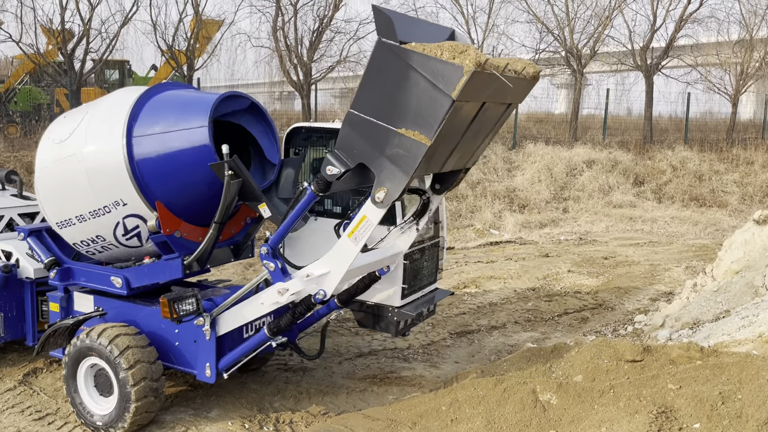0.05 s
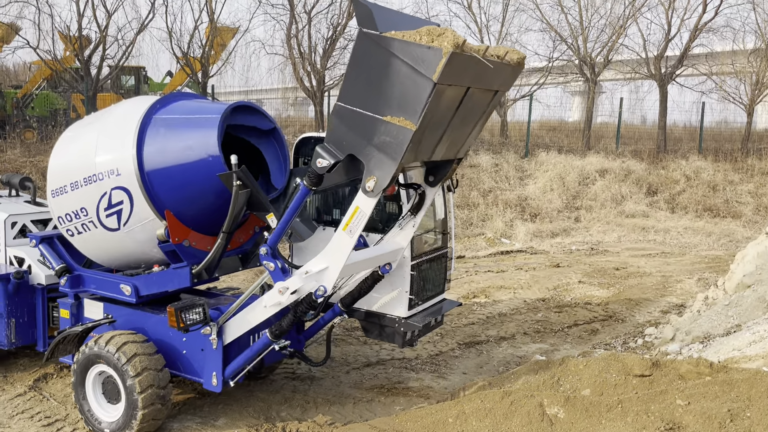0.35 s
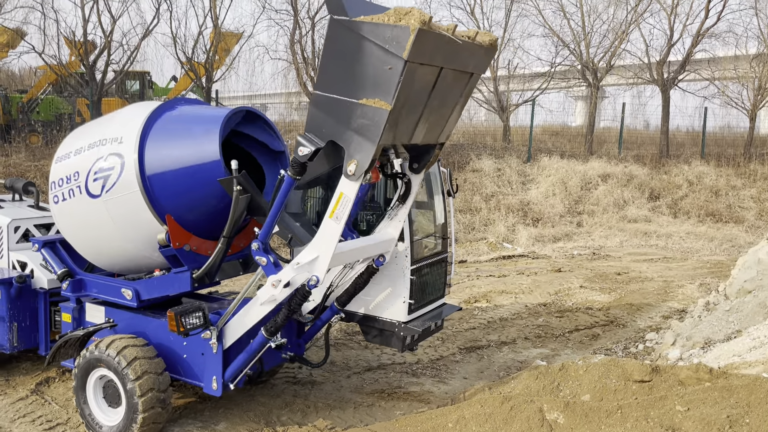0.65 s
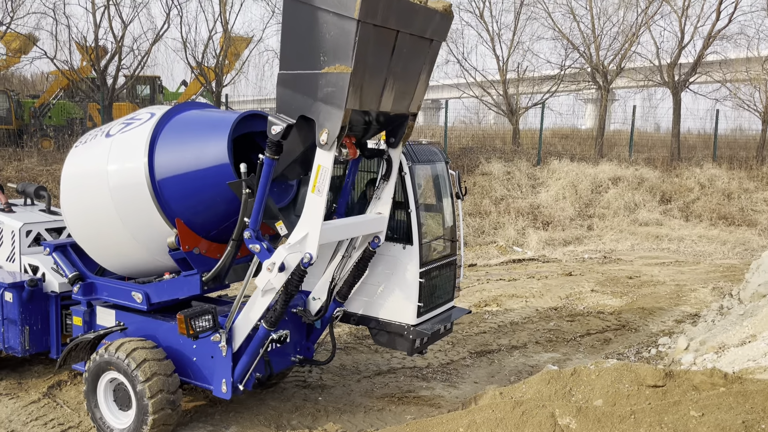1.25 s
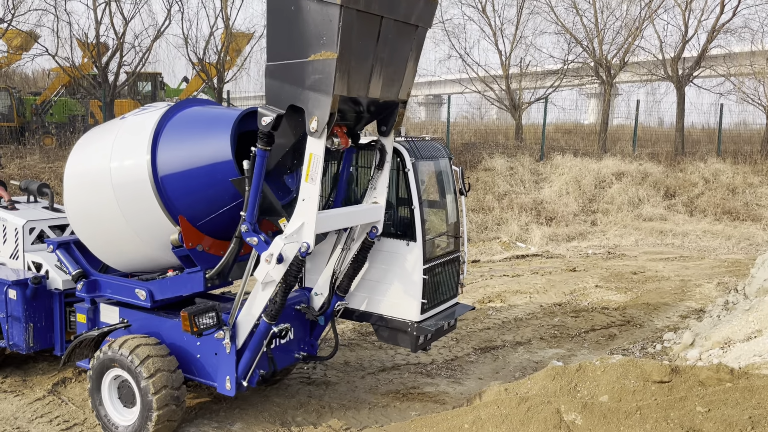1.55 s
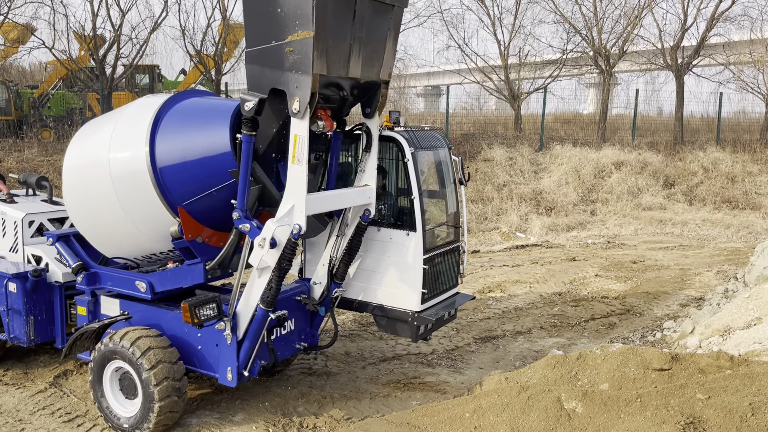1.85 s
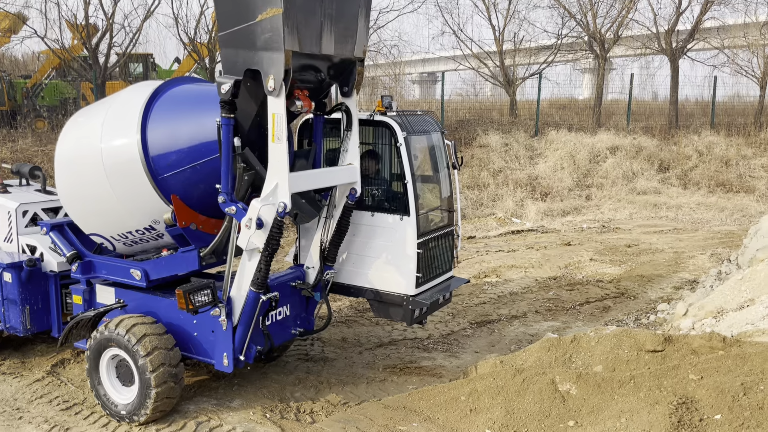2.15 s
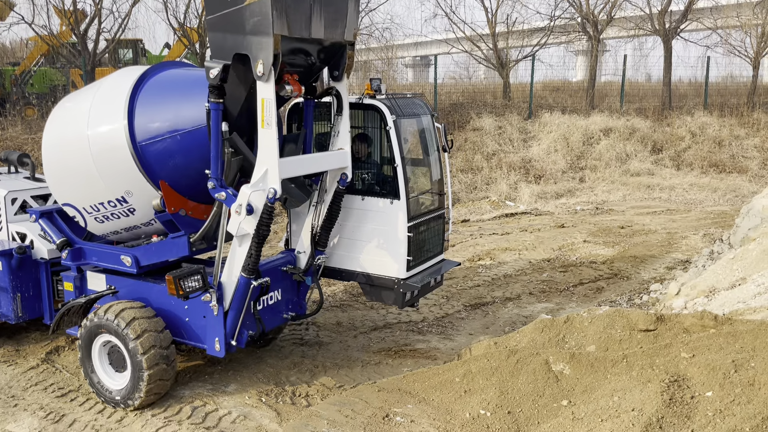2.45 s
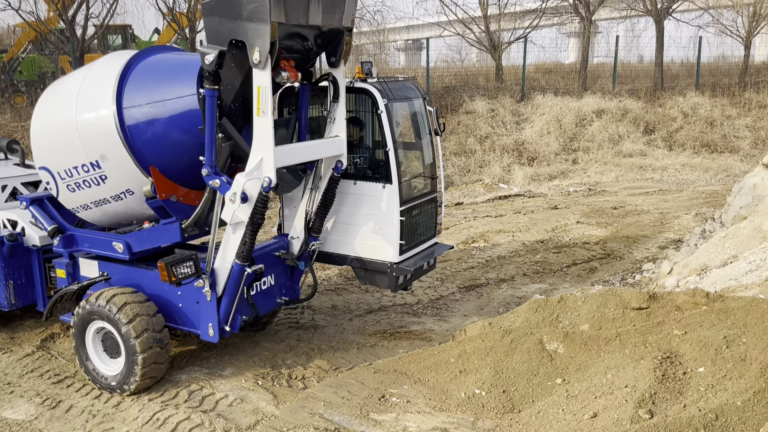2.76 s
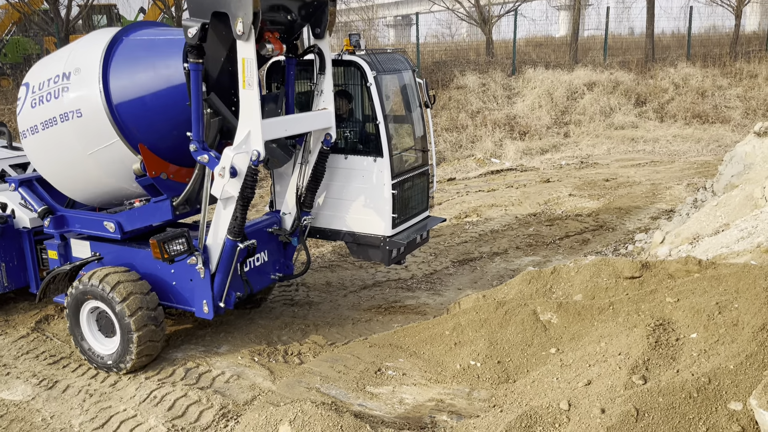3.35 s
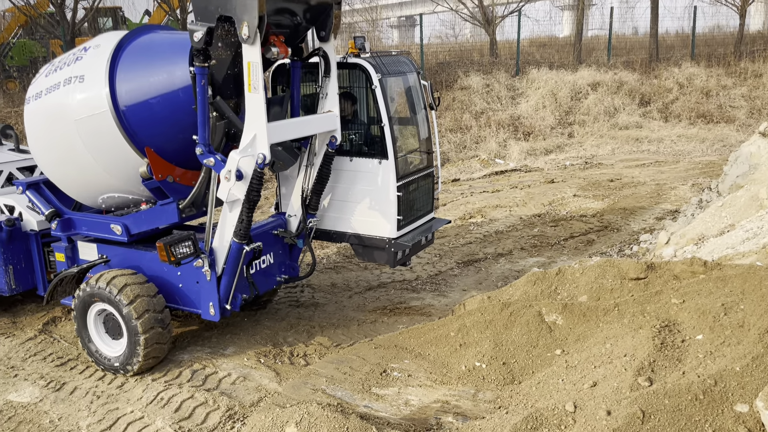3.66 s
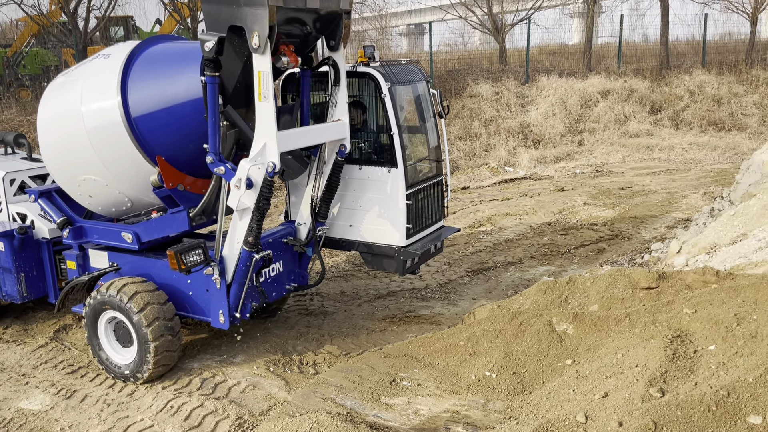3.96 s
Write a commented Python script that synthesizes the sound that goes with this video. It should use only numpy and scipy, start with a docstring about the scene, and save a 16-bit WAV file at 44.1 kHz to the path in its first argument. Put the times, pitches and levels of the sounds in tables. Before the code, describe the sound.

A concrete mixer's diesel engine roars with a hydraulic whine a few metres away on a work site. It drops to idle, loose steel clatters, pebbles tick and the loader arm clanks, then the engine revs up again.

```python
"""A self-loading concrete mixer works on sand a few metres away. Its four-cylinder diesel starts at
speed: exhaust notes, a roar that throbs with each firing, and gear and pump whines that light up panel
resonances. By 1.4 s it has dropped to idle and shakes loose steel parts into a clatter, while sand
and pebbles tick on steel and the loader arm clanks, loudest at 2.35 s. From 2.6 s the engine revs up
again with a growl and the clatter dies away."""
import sys
import numpy as np
from scipy import signal
from scipy.fft import rfft, irfft
from scipy.io import wavfile
from scipy.ndimage import uniform_filter1d

SR = 44100
rng = np.random.default_rng(int(sys.argv[2]) if len(sys.argv) > 2 else 0)


def generate_wav(signal):
    """Clip the signal to [-1, 1] and save it as 16-bit WAV at the path in sys.argv[1]."""
    frames = np.transpose(np.atleast_2d(signal))
    scaled = np.clip(frames, -1, 1) * 32767
    pcm = np.round(scaled).astype(np.int16)
    wavfile.write(sys.argv[1], SR, pcm)


N = 176400
T, HZ = np.arange(N) / SR, np.fft.rfftfreq(N, 1 / SR)

# engine speed and exhaust notes: (time [s], firing rate [Hz], levels at 1, 2 and 4 times that rate [dB])
DIESEL = [(0.0, 69.73, -44, -42, -28), (0.21, 69.24, -24.5, -33.5, -27.5), (0.45, 66.45, -43, -33, -39),
          (0.55, 64.35, -38, -40, -34), (0.78, 63.18, -31.5, -32, -32), (1.01, 55.8, -37, -67, -32),
          (1.18, 44.63, -41, -43, -49), (1.43, 36.37, -42, -40, -41), (1.69, 35.25, -47, -33, -46.5),
          (2.54, 35.65, -43, -36, -37.5), (2.62, 37.5, -40, -26.5, -38), (2.74, 42.45, -29, -26, -33.5),
          (2.86, 44.11, -35, -37, -46.5), (3.09, 52.3, -22, -29, -28.5), (3.26, 56.78, -21, -31, -31),
          (3.4, 59.45, -33, -39, -28), (3.64, 59.96, -23, -26, -24), (3.77, 67.47, -17.5, -28.5, -45),
          (3.86, 69.3, -43, -40, -30), (4.0, 68.6, -38, -34, -44)]
# punch of each cylinder, in firing order: (relative level [dB])
CYLINDERS = [0.73, -2.4, 1, -0.4]


def amp(db):
    """Decibels to gain."""
    return 10 ** (np.asarray(db) / 20)


def unit(x):
    """Scales to rms 1."""
    return x / np.sqrt(np.mean(x ** 2) + 1e-20)


def curve(table, column=1):
    """One column of a time table, at every sample."""
    rows = np.array(table)
    return np.interp(T, rows[:, 0], rows[:, column])


def spectrum(table):
    """A frequency table, at every bin."""
    hz, value = np.transpose(table)
    return np.interp(np.log(HZ + 1), np.log(hz + 1), value)


def drift(rate_hz):
    """Slow random movement of rms 1."""
    return unit(irfft(rfft(rng.standard_normal(N)) * np.exp(-(HZ / rate_hz) ** 2), N))


def add(mix, s, sound):
    """Adds a sound at time s."""
    part = mix[..., max(round(s * SR), 0):][..., :sound.shape[-1]]
    part += sound[..., :part.shape[-1]]


def stereo(pair, colour):
    """Colours a direct and a scattered signal and places them on the two microphone ports."""
    # likeness of the two ports: (frequency [Hz], correlation [0..1])
    likeness = [(105, .998), (310, .96), (610, .92), (1110, .79), (2200, .52), (4000, .74), (6500, .72),
                (8400, .95), (12000, .9)]
    # lead of the left port: (frequency [Hz], phase [rad])
    left_lead = [(0, 0), (100, .14), (300, .48), (780, 1.35), (1980, 2), (2410, 2.8), (3700, 6.5),
                 (5500, 7.3), (6630, 6.3), (7240, 3.9), (8500, 3.1), (9500, 2.2), (12200, .7), (14600, 0)]
    # balance: (frequency [Hz], left over right [dB])
    balance = [(200, 0.0), (370, 1.5), (690, 5.0), (1260, 8.0), (2330, 6.0), (4280, 5.5), (7870, 2.5),
               (14500, 0.0)]
    direct, scattered = rfft(pair)
    same, tilt = spectrum(likeness), amp(spectrum(balance) / 2)
    blend = same * direct + np.sqrt(1 - same ** 2) * scattered
    sides = np.array([direct * tilt, blend / tilt * np.exp(-1j * spectrum(left_lead))])
    return irfft(sides * colour / np.sqrt((tilt ** 2 + tilt ** -2) / 2), N)


def whines(cycles):
    """Gear tones, pump tones and the hiss of oil swell where they meet a panel resonance."""
    # engine orders and gear whines: (pitch [multiple of the firing rate])
    gear_orders = [5, 6, 6.5, 11.7, 20.7, 31]
    # drive of the gears: (time [s], level [dB])
    gear_level = [(0, -0.5), (.95, -2.5), (1.3, -16), (2.8, 2), (3.35, -1), (4, 3.5)]
    # hydraulic pump tones: (pitch [multiple of the firing rate])
    pump_orders = [17.6, 26.5, 41.3]
    # load on the pump: (time [s], level [dB])
    pump_load = [(0, -1.5), (.44, 4), (.54, -4), (3.6, -8.5), (3.85, -5), (4, -1)]
    # panel resonances: (frequency [Hz], width [Hz], gain [dB])
    panel_modes = [(372, 57, -30), (825, 52, -35), (1030, 75, -37.5), (1222, 47, -31), (1794, 140, -32),
                   (1943, 89, -37.5), (2880, 41, -32)]
    waver_db, waver_hz, rough_hz, oil_db = 1.5, 30.4, 70, 12
    phase, drive = 2 * np.pi * cycles, np.zeros((2, N))
    for side in drive:
        gears = sum(amp(waver_db * drift(waver_hz)) * np.sin(k * phase + .83 * drift(waver_hz))
                    for k in gear_orders)
        pump = sum(np.sin(k * phase + .7 * drift(rough_hz)) for k in pump_orders)
        oil = amp(oil_db) * rng.standard_normal(N)
        side += gears * amp(curve(gear_level)) + (pump + oil) * amp(curve(pump_load))
    panels = sum(amp(db) / (1 + (2 * (HZ - hz) / width) ** 2) for hz, width, db in panel_modes)
    return np.sqrt(2) * stereo(drive, panels)


def strike(fall_s, rise_s=.003):
    """Envelope of one knock: a quick rise and an exponential fall."""
    t = T[:SR // 8]
    return np.minimum(t / rise_s, 1) * np.exp(-np.maximum(t - rise_s, 0) / fall_s)


def metal(envelope, colour, low_cut_hz=399.4):
    """Gritty contact noise in steel, with no bass."""
    grit = rng.standard_normal((2, N)) * amp(-drift(rate_hz=704))  # 1 dB of fast flicker
    low_cut = HZ ** 2 / (HZ ** 2 + low_cut_hz ** 2)
    return unit(stereo(grit, colour * low_cut)) * envelope


def pebbles_and_arm():
    """Sand grains and pebbles tick brightly on steel; the loader arm gives duller clanks."""
    # ticks and clanks: (time [s], level [dB], fall [s], brightness [dB per octave])
    hits = [(1.237, -39, 0.0046, 16), (1.263, -39, 0.0046, 16), (1.5282, -29.5, 0.0042, 0),
            (1.5588, -34, 0.0046, 16), (1.782, -37, .006, 6), (2.3537, -22, 0.035, -8),
            (2.5106, -38, .003, 18), (2.6055, -27, 0.015, 3), (3.078, -30.5, .009, 17)]
    # tone of the struck steel: (frequency [Hz], relative level [dB])
    steel_colour = [(610, -20), (1510, -12), (2310, 2), (4110, 10), (7610, 9.5), (11010, 5), (14510, -20)]
    mix = np.zeros((2, N))
    for s, db, fall_s, brightness in hits:
        envelope = np.zeros(N)
        add(envelope, s, amp(db) * strike(fall_s))
        mix += metal(envelope, amp(spectrum(steel_colour) + brightness * np.log2(HZ + 1)))
    return mix


def clatter(firings):
    """Around idle, loose steel knocks and bounces at every firing; each contact sets it ringing."""
    # amount of rattle: (time [s], level [dB])
    rattle_level = [(1.1, -59), (1.25, -39), (1.45, -39), (1.6, -31), (1.9, -33.5), (2.15, -34), (2.3, -31),
                    (2.58, -32), (2.7, -37), (2.83, -34.5), (3, -48)]
    # harder knocks of the same steel: (time [s], level [dB], fall [s])
    hard_knocks = [(1.2005, -34, .0045), (1.2398, -34, 0.0061), (1.3185, -36, .0045), (1.587, -26, 0.0061),
                   (1.6135, -29, 0.0094), (1.6306, -31, 0.006), (1.8125, -32, 0.0031),
                   (1.894, -27.5, 0.0087), (2.232, -32, 0.0056), (2.2497, -26, 0.0047),
                   (2.287, -31, 0.0058), (2.455, -26, 0.0069), (2.513, -37, .007), (2.562, -30, .007),
                   (2.793, -26, 0.0036), (2.8637, -29, 0.0032)]
    # tone of a contact: (frequency [Hz], relative level [dB])
    contact_colour = [(810, -9), (2510, 9.5), (3260, 5), (4560, 6), (4990, 6.5), (5610, -1.5),
                      (7610, -12.5), (11510, -6), (14510, -23)]
    # modes of the loose steel: (frequency [Hz], width [Hz], gain [dB])
    steel_modes = [(3770, 38, -3), (4170, 58, 8), (4390, 65, 4.5), (4950, 100, 4.5), (6900, 1400, 7.5)]
    jitter_s, scatter_db, bounce_s, bounce_db = .0018, 6, .013, -3
    knock = strike(fall_s=.0081)
    shake, hard = np.zeros(N), np.zeros(N)
    for s in firings:
        late, force, bounce_late = rng.standard_normal(3)
        add(shake, s + jitter_s * late, amp(scatter_db * np.tanh(force)) * knock)
        add(shake, s + bounce_s + jitter_s * bounce_late, amp(bounce_db) * knock)
    for s, db, fall_s in hard_knocks:
        add(hard, s, amp(db) * strike(fall_s))
    envelope = np.hypot(unit(shake) * amp(curve(rattle_level)), hard)
    contact = metal(envelope, amp(spectrum(contact_colour)))
    ring = sum(amp(db) * signal.lfilter(*signal.iirpeak(hz, hz / width, fs=SR), contact)
               for hz, width, db in steel_modes)
    return amp(-3) * (contact + ring)


def exhaust(cycles):
    """Low notes on multiples of the firing rate; they lope at idle and growl under acceleration."""
    # overtones: (pitch [multiple of the firing rate], level at idle [dB], level at full speed [dB])
    overtones = [(3, -40, -46), (5, -41, -47), (6.5, -49, -42.5), (8, -43.5, -39.5), (9.2, -57, -44.5)]
    idle_hz, full_hz, growl_db, hard_pull_hz_per_s, waver_db = 33.3, 62.4, 7, 18, 2
    rate = curve(DIESEL)
    speed = np.clip((rate - idle_hz) / (full_hz - idle_hz), 0, 1)
    acceleration = uniform_filter1d(np.gradient(rate) * SR, size=SR // 10)
    pull = np.clip(acceleration / hard_pull_hz_per_s, 0, 1)
    lope = 1 + .28 * (1 - speed) * np.sin(2 * np.pi * cycles / len(CYLINDERS))
    notes = [(2 ** k, curve(DIESEL, column=k + 2) - .4) for k in range(3)]
    notes += [(k, idle + (full - idle + growl_db * pull) * speed) for k, idle, full in overtones]
    pipe = sum(amp(db + waver_db * drift(rate_hz=10)) * np.sin(2 * np.pi * (k * cycles + rng.random()))
               for k, db in notes)
    return np.sqrt(2) * stereo(np.array([lope * pipe, np.zeros(N)]), .95)


def roar(cycles, firings):
    """Each cylinder rings the block its own way, over fan and combustion noise that throbs in step."""
    # band faders of the roar: (time [s], bass [dB], middle [dB], treble [dB])
    faders = [(0, -26, -23, -27), (0.25, -25.5, -24, -28.5), (0.78, -26.5, -24, -31),
              (0.97, -26.5, -25, -33), (1.15, -30, -29, -37.5), (1.42, -32, -29, -38.5),
              (1.65, -28.5, -24.5, -36), (2.1, -28.5, -25, -34.5), (2.55, -27.5, -24, -33),
              (2.88, -26, -24.0, -32.5), (3.15, -26.5, -21, -29), (3.45, -23.5, -22, -28),
              (3.68, -22.5, -19.5, -25), (4.0, -22, -21.5, -26.5)]
    # tone of the roar: (frequency [Hz], relative level [dB])
    roar_colour = [(22, -34), (42, -6), (74, 5), (115, 1.5), (170, 1.4), (300, 0.1), (370, 0), (440, -1.2),
                   (550, 1.75), (660, -3.5), (770, 0), (950, -5.5), (1220, -3), (1600, -6.5), (1900, -9),
                   (2300, -12), (3200, -14), (5200, -16.5), (6300, -18.5), (7600, -25), (10300, -22.5),
                   (12500, -24.5), (14500, -44)]
    ring_s, ring_share, scatter_db, throb_depth, throb_cycles = .022, .19, 2.5, .13, .24
    bass_edge_hz, treble_edge_hz = 452, 1990
    t, count = T[:SR // 12], len(CYLINDERS)
    rings = rng.standard_normal((count, 2, len(t))) * np.exp(-t / ring_s)
    rush = rng.standard_normal((2, N)) * (1 + throb_depth * np.exp(-(cycles % 1) / throb_cycles))
    block = np.zeros((2, N))
    for k, s in enumerate(firings):
        punch = amp(CYLINDERS[k % count] + scatter_db * rng.standard_normal())
        add(block, s, punch * rings[k % count])
    drive = np.sqrt(ring_share) * unit(block) + np.sqrt(1 - ring_share) * unit(rush)
    bass = 1 / (1 + (HZ / bass_edge_hz) ** 8)
    treble = 1 - 1 / (1 + (HZ / treble_edge_hz) ** 8)
    middle = np.maximum(1 - bass - treble, 0)
    colour = amp(spectrum(roar_colour))
    return sum(unit(stereo(drive, colour * band)) * amp(curve(faders, column) + trim_db)
               for column, band, trim_db in [(1, bass, -2), (2, middle, -1.22), (3, treble, -1.6)])


def scene():
    """One engine speed paces exhaust, whines, roar and clatter; ticks and clanks keep their own time."""
    rate = curve(DIESEL) * (1 + .0032 * drift(rate_hz=11))
    cycles = np.cumsum(rate) / SR  # one cycle a firing
    firings = T[1:][np.diff(np.floor(cycles)) > 0]
    return (exhaust(cycles) + whines(cycles) + pebbles_and_arm()
            + roar(cycles, firings) + clatter(firings))


def record(dry):
    """A narrow dip in the microphone's treble, then the band limit."""
    notch_hz, width_hz, notch_db, high_cut_hz = 5640, 106, -14, 15000
    notch = amp(notch_db * np.exp(-((HZ - notch_hz) / width_hz) ** 2))
    high_cut = signal.firwin(511, high_cut_hz, window=("kaiser", 9), fs=SR)
    return signal.oaconvolve(irfft(rfft(dry) * notch, N), high_cut[None], "same")


dry = scene()
out = record(dry)
generate_wav(out)
```